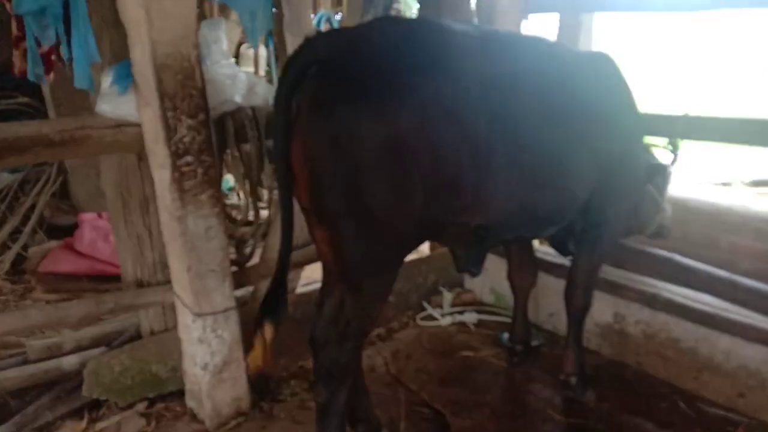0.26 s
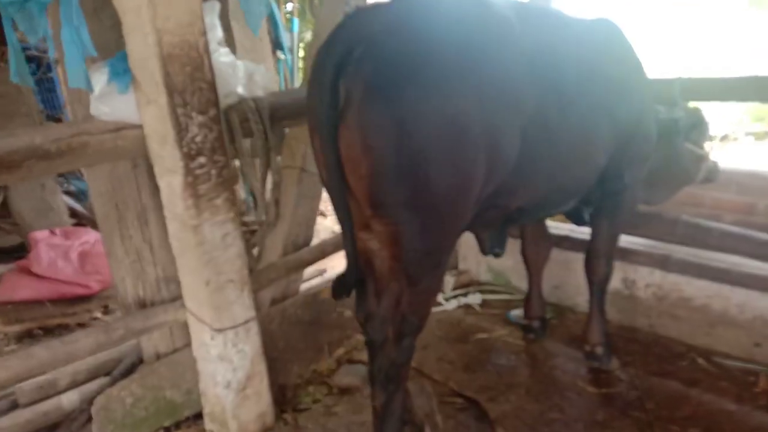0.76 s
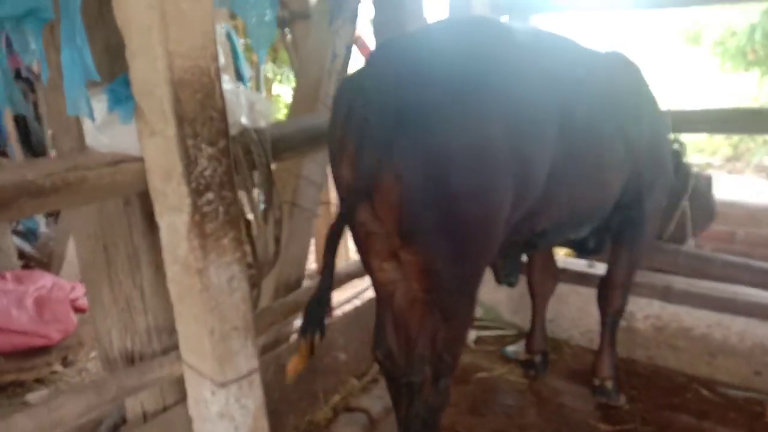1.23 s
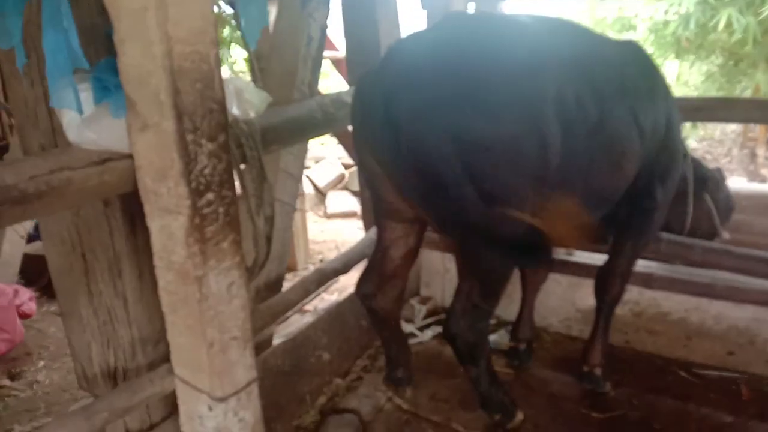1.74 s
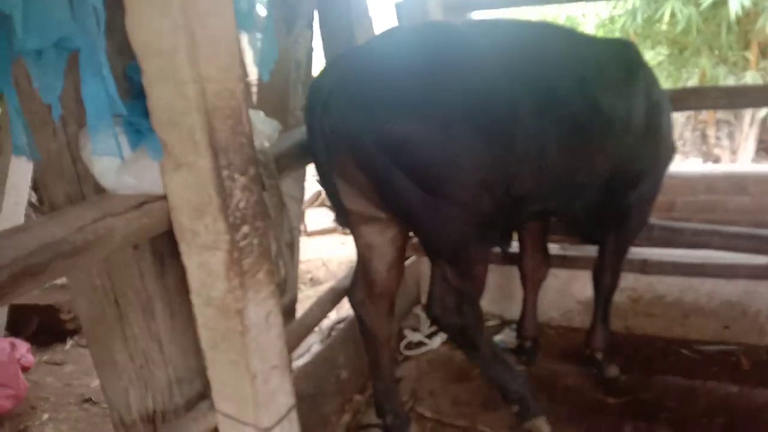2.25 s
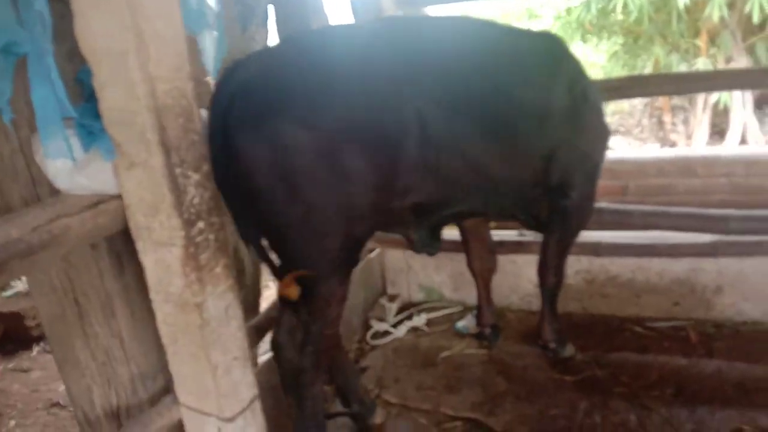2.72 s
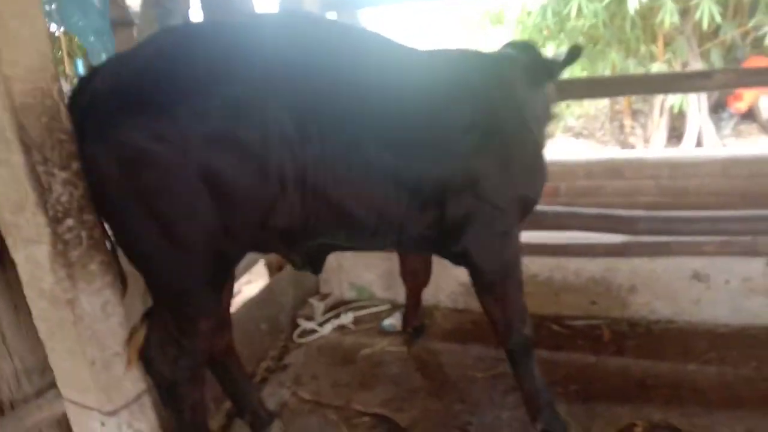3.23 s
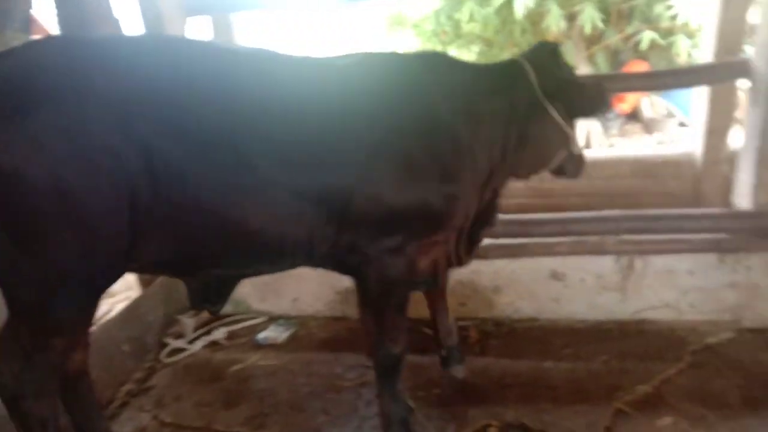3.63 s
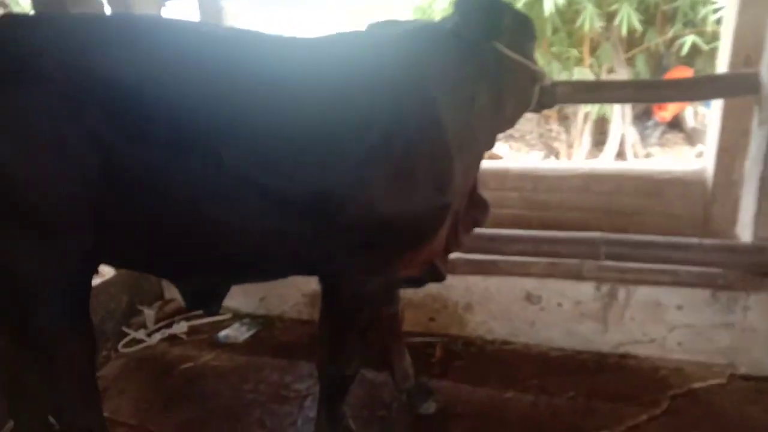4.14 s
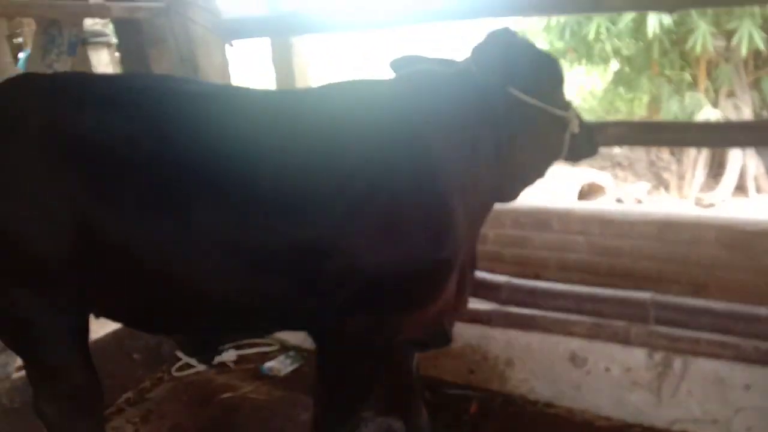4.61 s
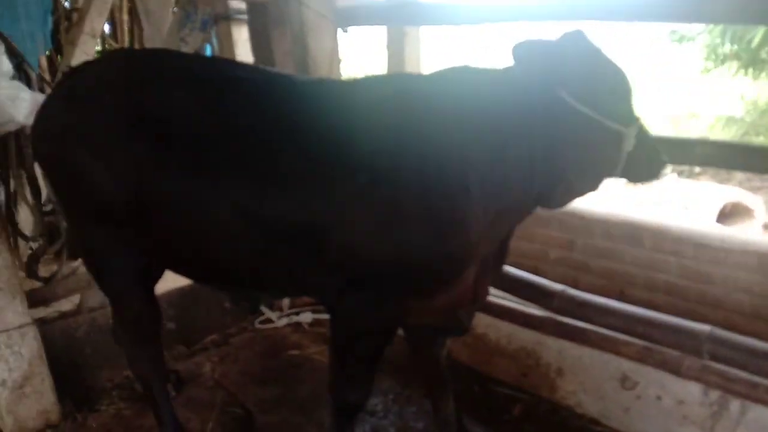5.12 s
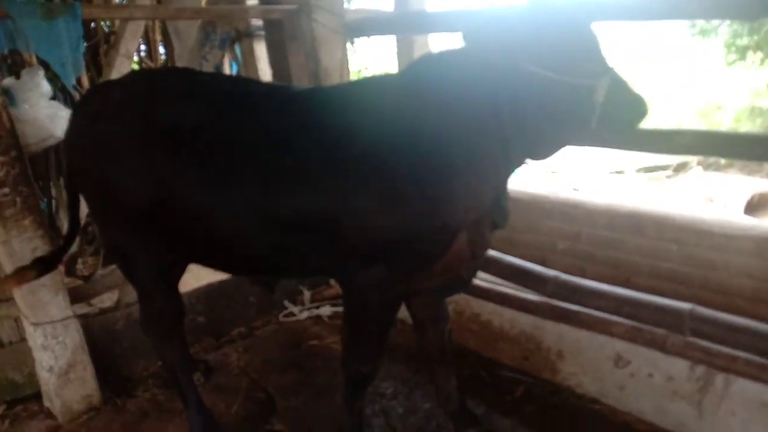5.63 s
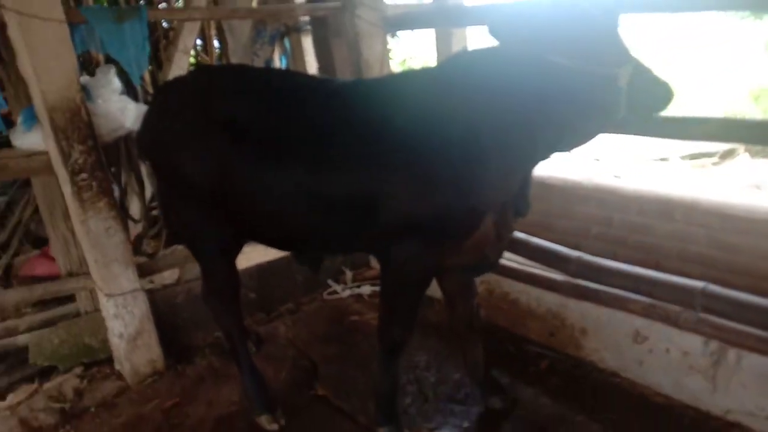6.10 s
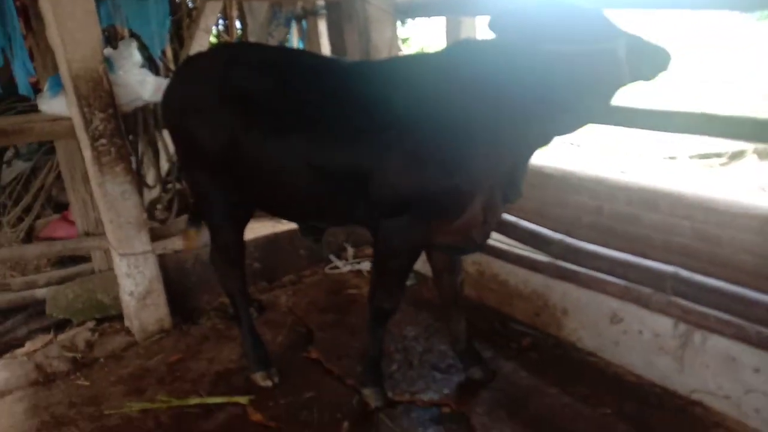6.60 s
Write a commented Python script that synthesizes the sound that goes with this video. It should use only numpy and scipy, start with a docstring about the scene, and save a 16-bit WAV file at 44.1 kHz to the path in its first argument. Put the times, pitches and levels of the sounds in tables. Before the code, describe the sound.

A soft outdoor hiss, a low throbbing rumble and a faint high insect sit in the background of an open barn, heard through a phone microphone with a short reverberation. Hooves scuff lightly in straw around 0.5 seconds. From 0.8 to 1.7 seconds a calf gives one low, booming moo, sinking in pitch and ending rough and breathy. Hooves knock on boards near 2 seconds, then keep scuffing and knocking, with a sharp scrape just after 3 seconds. From about 2.9 to 5 seconds a rooster in the yard crows hoarsely in short broken notes, holding longer ones around 4 to 4.7 seconds. Quieter straw rustles follow, with hoof knocks near 5.7 and 6.4 seconds and a faint, far bird whistle around 6.4 seconds. At about 6.8 seconds a new moo just begins as the sound ends.

```python
"""A calf moos once in an open barn, then a rooster crows hoarsely in the yard; a new moo sets in at the end.
Hooves scuff and knock on floor and boards, straw rustles, an insect and a far bird whistle faintly
and a low rumble throbs. Both voices are pulses plus breath, shaped by mouth and nose or by the beak;
low resonances of throat and barn make the moo boom. Hooves are noise bursts and board rings.
The phone's microphone port rings near 1.3 and 7.5 kHz and dips slightly near 15 kHz."""
import sys
import numpy as np
from scipy import signal
from scipy.fft import rfft, irfft, next_fast_len
from scipy.io import wavfile
from scipy.ndimage import uniform_filter1d, map_coordinates

SR = 44100
rng = np.random.default_rng(int(sys.argv[2]) if len(sys.argv) > 2 else 0)


def master(y):
    """Save y as 16-bit WAV."""
    cut = np.clip(np.atleast_2d(y).T, -1, 1)
    pcm = np.round(cut * 32767)  # scale
    wavfile.write(sys.argv[1], SR, pcm.astype(np.int16))


N = 302526

# straw spectrum: (frequency [Hz], gain [dB])
STRAW_SPECTRUM = [(3000, -14), (5500, -0.5), (7200, 1), (8600, -6), (10500, -13.5), (13200, -22.5),
                  (14600, -6.5), (15800, -7)]


def amp(db):
    return 10 ** (np.asarray(db) / 20)


def unit(x):
    return x / np.sqrt(np.mean(x ** 2) + 1e-20)


def along(points, hz):
    """Interpolate (Hz, value) points on a log axis."""
    f, v = np.transpose(points)
    return np.interp(np.log(hz + 1), np.log(f + 1), v)


def curves(rows):
    """One value per sample for each column after the time."""
    s, *cols = np.transpose(rows)
    return [np.interp(np.arange(N) / SR, s, c) for c in cols]


def sounding(rows):
    """1 between the first and last row, with 5 ms edges."""
    t = np.arange(N) / SR
    return uniform_filter1d(1. * ((t > rows[0][0]) & (t < rows[-1][0])), size=220)


def wobble(rate_hz):
    """Smooth random curve, rate_hz knots a second."""
    at = np.arange(0, N + 16, 16)
    knots = rng.standard_normal(int(N * rate_hz / SR) + 4)
    return np.interp(np.arange(N), at, map_coordinates(knots, [at * rate_hz / SR]))


def filtered(x, response):
    m = next_fast_len(N + SR // 2)
    return irfft(rfft(x, m) * response(np.fft.rfftfreq(m, 1 / SR)), m)[..., :N]


def band(f, hz, width_hz):
    """Causal resonance, gain 1 at its centre."""
    return 1j * f * width_hz / (hz * hz - f * f + 1j * f * width_hz)


def modes(x, table):
    """Parallel resonances of alternating sign."""
    return filtered(x, lambda f: sum((-1) ** k * amp(db) * band(f, hz, width_hz)
                                     for k, (hz, width_hz, db) in enumerate(table)))


def coloured(x, spectrum):
    return filtered(x, lambda f: amp(along(spectrum, f)))


def steady(x, size):
    """Running rms brought to 1."""
    return x / np.sqrt(np.abs(uniform_filter1d(x * x, size)) + 1e-12)


def pulses(phase, sharp):
    """Pulse train; harmonic k goes as sharp^k."""
    return unit((1 - sharp ** 2) / (1 - 2 * sharp * np.cos(phase) + sharp ** 2) - 1)


def bursts(rows):
    """Envelope from (time [s], level [dB], rise [s], t60 [s]) rows."""
    env, t = np.zeros(N + SR), np.arange(SR // 3) / SR
    for s, db, rise_s, t60_s in rows:
        env[round(s * SR):][:len(t)] += amp(db - 60 * t / t60_s) * (1 - np.exp(-t / rise_s))
    return env[:N]


def crackle(spectrum, grains_per_s=500, spread_db=3):
    """Coloured noise with sparse sharp grains."""
    hits = rng.random(N) < grains_per_s / SR
    grains = hits * amp(spread_db * np.minimum(rng.exponential(size=N), 3)) * rng.standard_normal(N)
    hiss = rng.standard_normal(N) * amp(2 * wobble(120))
    return unit(coloured(hiss + 2.2 * grains, spectrum))


def whistle(rows):
    """Sliding noise band from (time [s], centre [Hz], width [Hz], level [dB]) rows."""
    hz, width_hz, db = curves(rows)
    at = np.cumsum(width_hz) / SR
    count = int(at[-1]) + 4
    i, q = [np.interp(at, np.arange(count), rng.standard_normal(count)) for _ in range(2)]
    phase = 2 * np.pi * np.cumsum(hz) / SR
    return sounding(rows) * amp(db) * (i * np.cos(phase) + q * np.sin(phase))


def yard():
    """Gusty hiss with random gain patches, some hundred Hz by 0.1 s."""
    # (frequency [Hz], gain [dB])
    spectrum = [(150, -1), (400, -6.5), (800, -6.5), (1500, -5.5), (2200, -15), (3500, -18), (5000, -16.5),
                (7500, -20), (9000, -53.5), (12000, -48), (16000, -41)]
    # (time [s], level [dB])
    levels = [(0, -51), (.75, -54), (.95, -45.5), (1.75, -50), (2.3, -57.5), (2.85, -50.5), (4.5, -57.5),
              (4.95, -51), (5.15, -56), (5.8, -61), (6.35, -53.5), (6.7, -54.5), (6.86, -49)]
    gusts = amp(1.8 * wobble(12))
    z = signal.stft(rng.standard_normal(N), nperseg=512)[2]
    patches = uniform_filter1d(rng.standard_normal(z.shape), size=5, axis=0)
    patch_db = 3.5 * unit(uniform_filter1d(patches, size=16, axis=1))
    hiss = signal.istft(z * amp(patch_db), nperseg=512)[1][:N]
    return amp(curves(levels)[0]) * gusts * unit(coloured(hiss, spectrum))


def rumble():
    """Low noise throbbing about ten times a second."""
    # (frequency [Hz], gain [dB])
    spectrum = [(25, -53), (55, -12), (92, -1), (125, -5), (180, -21), (300, -68.5)]
    # (time [s], level [dB])
    levels = [(0, -51), (3, -57), (5.0, -50), (5.8, -49.5), (6.86, -49.5)]
    throb_hz = 9.5 + 2 * wobble(3)
    throb_db = 4 * np.cos(2 * np.pi * np.cumsum(throb_hz) / SR) + 2.5 * wobble(20)
    drift_db = 2 * wobble(5)
    noise = coloured(rng.standard_normal(N), spectrum)
    return amp(curves(levels)[0]) * unit(amp(throb_db + drift_db) * noise)


def insect_and_bird():
    """Two faint whistles that come and go."""
    # (time [s], centre [Hz], width [Hz], level [dB])
    insect = [(0, 4540, 80, -60), (.46, 4520, 80, -59), (.52, 4480, 90, -70), (5.1, 4480, 120, -67),
              (5.5, 4420, 120, -65), (6.1, 4620, 120, -65), (6.2, 4800, 120, -67), (6.86, 4600, 120, -74)]
    bird = [(6.2, 5920, 150, -66), (6.45, 6360, 100, -59), (6.58, 6400, 100, -73)]
    return unit(amp(2.5 * wobble(14))) * (whistle(insect) + whistle(bird))


def straw_and_breath():
    """Straw rustle, plus the breathy high hiss of the calf's moo from 1.0 to 1.6 s."""
    # (time [s], level [dB])
    levels = [(0, -59), (.3, -66), (.88, -59.5), (1.03, -49), (1.15, -55.5), (1.5, -44), (1.72, -56.5),
              (2.75, -58.5), (3.0, -61), (4.5, -62), (5.05, -73.5), (5.18, -54), (5.36, -54.5), (5.48, -71),
              (5.72, -49.5), (5.95, -66.5), (6.86, -64.5)]
    hiss = crackle(STRAW_SPECTRUM, grains_per_s=690, spread_db=-5)
    return amp(curves(levels)[0]) * unit(hiss * amp(1.6 * wobble(23)))


def hoof_scuffs():
    """A tick, then straw rustle and a duller drag."""
    # (time [s], straw [dB], drag [dB], t60 [s])
    scuffs = [(.063, -47.5, -56, 0.11), (0.502, -48.5, -53, .2), (.64, -46.5, -40, 0.16),
              (2.09, -44.5, -52, 0.049), (2.149, -45.5, -58, 0.18), (2.197, -43, -52.5, 0.16),
              (2.333, -36, -58, 0.24), (2.486, -36.5, -40.5, 0.079), (2.597, -39, -42, 0.24),
              (2.744, -43.5, -41, .12), (2.852, -42, -40.5, 0.43), (2.921, -54, -33, .055),
              (3.143, -25, -32, 0.092), (3.18, -42, -36, .12), (3.436, -43, -51, 0.14),
              (3.667, -34.5, -34.5, 0.12), (3.912, -36.5, -40, 0.19), (4.05, -38.5, -53.5, 0.11),
              (4.158, -40, -42, 0.15), (4.318, -31, -40, 0.086), (4.465, -45.5, -54, .084),
              (4.59, -39.5, -37, .19), (4.735, -44, -44, 0.15), (5.161, -50, -54.5, .11),
              (5.228, -54.5, -55, 0.12), (5.454, -49.5, -53, 0.2), (5.612, -49.5, -45.5, .16),
              (5.654, -44.5, -45, .22), (5.6903, -45, -61, 0.074), (5.751, -48.5, -58, 0.35),
              (6.259, -49, -59, 0.15), (6.377, -53, -62.5, .1), (6.493, -48.5, -64, 0.049)]
    # (frequency [Hz], gain [dB])
    drag_spectrum = [(1200, -2.5), (2500, -6.5), (4500, 1.5), (6300, -3), (8000, -19)]
    rise_per_t60, tick_db, tick_rise_s, tick_t60_s = .047, -7.5, .0005, .014
    rustles = bursts([(s, db, rise_per_t60 * t60, t60) for s, db, _, t60 in scuffs])
    drags = bursts([(s, db, rise_per_t60 * t60, t60) for s, _, db, t60 in scuffs])
    ticks = bursts([(s, db + tick_db, tick_rise_s, tick_t60_s) for s, db, _, _ in scuffs])
    return (rustles + ticks) * crackle(STRAW_SPECTRUM) + (drags + ticks) * crackle(drag_spectrum)


def hoof_knocks():
    """Each hoof thuds, clacks and briefly rings the board it lands on."""
    # (time [s], thud [dB], clack [dB], t60 [s], ring [Hz], ring [dB])
    knocks = [(0.502, -42.5, -47.5, 0.24, 460, -46), (0.626, -39.5, -49.5, .27, 310, -38.5),
              (1.836, -35.5, -49, 0.063, 1040, -29.5), (1.843, -56, -58, 0.079, 397, -32.5),
              (1.957, -38, -41.5, 0.18, 2500, -25), (2.015, -36, -68, 0.097, 604, -48),
              (2.488, -44, -46, 0.1, 354, -43), (3.438, -35.5, -46, 0.057, 318, -28.5),
              (3.908, -31.5, -47, 0.074, 308, -32.5), (5.66, -51.5, -54, 0.14, 890, -72),
              (5.696, -63, -45, 0.094, 1570, -31.5), (6.218, -50, -73, 0.34, 407, -45),
              (6.386, -33, -47.5, 0.08, 1680, -31)]
    # (frequency [Hz], gain [dB])
    thud_spectrum = [(120, 4.5), (250, 3), (450, 6), (900, 3), (1500, -36.5)]
    clack_spectrum = [(500, -48), (1100, 10.5), (2500, 2.5), (4000, -4), (7000, -56)]
    thud_rise_s, clack_rise_s, ring_t60_cycles = .0064, .0016, 22.5
    thuds = bursts([(s, db, thud_rise_s, t60) for s, db, _, t60, *_ in knocks])
    clacks = bursts([(s, db, clack_rise_s, t60) for s, _, db, t60, *_ in knocks])
    rings, t = np.zeros(N + SR), np.arange(SR // 5) / SR
    for s, *_, hz, db in knocks:
        decay = amp(db - 60 * t * hz / ring_t60_cycles)
        rings[round(s * SR):][:len(t)] += decay * np.sin(2 * np.pi * hz * t)
    return rings[:N] + thuds * crackle(thud_spectrum) + clacks * crackle(clack_spectrum)


def crow_phrase():
    """Gain and voicing curves: each note starts fast, dies slower and glides into the next."""
    # (start [s], end [s], first pitch [Hz], last pitch [Hz], first level [dB], last level [dB],
    #  pitch/3 beat [depth], pitch/2 beat [depth], hoarseness [0-1], low, overtone, rasp [dB re note])
    notes = [(2.854, 2.91, 704.3, 729, -37, -37, .3, .4, 0.53, -8, -26, -9.5),
             (2.949, 2.986, 659.4, 639, -35, -39, .05, 1, 0.37, -6, -32, -8),
             (3.124, 3.145, 630, 643.8, -32.5, -38.5, 0.22, 0.68, .3, -4, -39, -10.5),
             (3.164, 3.241, 750, 773.8, -33.5, -28, 0.24, 0.25, 0.26, -9, -30, -12),
             (3.333, 3.356, 658.5, 657, -35, -28.5, 0.056, 0.37, 0.31, -12, -40, -19.5),
             (3.379, 3.569, 774.5, 759.7, -31, -32.5, 0.69, 0.43, 0.31, -6.5, -31, -14),
             (3.59, 3.669, 668, 665.3, -31, -32, .05, .4, 0.33, -10.5, -38, -17),
             (3.711, 3.766, 683.5, 687, -32, -36, .05, 0.78, 0.16, -16.5, -36, -17.5),
             (3.805, 3.861, 903, 873.7, -39.5, -53, 0.14, 0.13, 0.08, -2, -19, -8.5),
             (3.892, 3.932, 917, 925.6, -44, -43, 0.1, 0.22, 0.02, -1, -17.5, -9.5),
             (3.95, 4.287, 806.3, 798.3, -35, -37, 1.56, .1, 0.32, -8, -14, -15),
             (4.341, 4.419, 831, 802.4, -34.5, -30.5, 0.6, .06, .1, -18.5, -17.5, -18.5),
             (4.465, 4.678, 816, 786.4, -32.5, -33, 0.041, .03, 0, -19, -18.5, -31.5),
             (4.7, 4.733, 676.7, 670.5, -33.5, -34.5, .05, 0.27, .2, -31, -22, -23),
             (4.761, 4.787, 638.7, 634.7, -39.5, -41, 0.88, 0.2076, .2, -17, -13, -11.5),
             (4.802, 4.863, 934, 905, -42.5, -44, 0.044, .6, 0, 1, -17, -13),
             (4.873, 4.89, 644, 654.6, -35, -37, .05, .02, 0.06, -25, -29.5, -25),
             (4.905, 4.985, 732, 710.6, -33.5, -44, 1.3, .02, 0.55, -6.5, -18.5, -18.5)]
    attack_s, release_s, rest_db, waver_db = .038, .068, -62.5, 4.5
    t = np.arange(N) / SR
    envelopes_db, knots = [], []
    for start, end, first_hz, last_hz, first_db, last_db, *timbre in notes:
        corners_s = [start - attack_s, start, end, end + release_s]
        envelopes_db.append(np.interp(t, corners_s, [rest_db, first_db, last_db, rest_db]))
        knots += [(start, first_hz, *timbre), (end, last_hz, *timbre)]
    voicing = curves(knots)
    hoarse = voicing[3]
    db = uniform_filter1d(np.max(envelopes_db, axis=0), size=400) + waver_db * hoarse * wobble(30.16)
    gate = sounding([(notes[0][0] - attack_s,), (notes[-1][1] + release_s,)])
    return gate * amp(db), voicing


def rooster():
    """Syrinx pulses beat at a third or half of the pitch and break into flutter when hoarse."""
    # voice bands: (frequency [Hz], gain [dB])
    beak_low = [(330, -72), (480, 5), (750, 3.5), (1000, 6), (1150, -38.5)]
    beak_mid = [(900, -39), (1100, 0), (1350, 4), (1600, 4), (1900, -9), (2080, -23), (2250, -30),
                (2400, -100.5)]
    beak_top = [(1600, -34), (1800, 13), (2100, -8.5), (2350, -43)]
    overtone = [(2000, -70), (2250, 11.5), (2800, 2.5), (3500, 5), (3900, -44.5)]
    rasp = [(3700, -43), (4300, 0.5), (5600, 0), (6400, -6.5), (8500, -23), (10500, -42)]
    # beak_top band: (time [s], level [dB re note])
    top_levels = [(2.85, -15), (3.15, -3), (3.7, -15), (4.0, -32)]
    # one track per wheeze: (time [s], centre [Hz], width [Hz], level [dB])
    wheezes = [
        [(3.36, 3110, 350, -61), (3.5, 2858, 198.6, -48), (3.74, 2764, 39.9, -52.5), (3.93, 2620, 40, -59)],
        [(3.92, 5570, 499.5, -57), (3.98, 5180, 497, -48), (4.08, 5000, 497, -56)],
        [(3.9, 4720, 597, -56), (4.03, 4430, 493, -39.5), (4.17, 4050, 512, -48.5)],
        [(4.02, 3750, 499.5, -45.5), (4.14, 3480, 498, -44.5), (4.42, 3070, 288, -57)],
        [(4.72, 2910, 120.2, -56.5), (4.86, 3027, 39.6, -45.5), (5.0, 2860, 100, -61)],
    ]
    gain, (hz, third, half, hoarse, low_db, overtone_db, rasp_db) = crow_phrase()
    jitter = .001 * wobble(30) + hoarse * (.035 * wobble(55) + .04 * wobble(14))
    phase = 2 * np.pi * np.cumsum(hz * (1 + jitter)) / SR
    beat = 1 + third * amp(3 * wobble(18)) * np.cos(phase / 3) + half * np.cos(phase / 2)
    flutter = np.sqrt(1 - hoarse) + np.sqrt(hoarse) * unit(wobble(500))
    hiss = rng.standard_normal(N) * amp(2.9 * wobble(80))  # air leaking past the membranes
    syrinx = pulses(phase, sharp=.923) * beat * flutter + .3 * hoarse * hiss
    parts = [(syrinx, beak_low, low_db), (syrinx, beak_mid, 0), (syrinx, beak_top, *curves(top_levels)),
             (syrinx + .9 * hiss, overtone, overtone_db), (syrinx + 2.7 * hiss, rasp, rasp_db)]
    voice = sum(amp(db) * steady(coloured(x, spectrum), size=2200) for x, spectrum, db in parts)
    return gain * voice + sum(whistle(rows) for rows in wheezes)


def calf():
    """Vocal-fold pulses and breath gated once a cycle ring mouth and nose and boom in throat and barn."""
    # one track per moo: (time [s], pitch [Hz], mouth [dB], boom [dB], nose [dB], bright edge [dB])
    moos = [
        [(.79, 92, -75, -71, -71, -77), (.805, 93.6, -40, -41.5, -48, -64.5),
         (.858, 104.8, -25.5, -33.5, -36, -41.5), (.954, 109, -23.5, -29.5, -29, -32.5),
         (1.03, 107, -23.5, -32.5, -29.5, -36), (1.148, 103.3, -22, -33, -33, -40.5),
         (1.243, 100.7, -22.5, -28, -30, -38), (1.349, 96.7, -23, -25, -35.5, -44),
         (1.411, 93.4, -24.5, -23, -36.5, -49), (1.469, 91.82, -17.5, -30, -31.5, -37.5),
         (1.503, 91.24, -34, -23.5, -39.5, -47.5), (1.553, 78.5, -25.5, -17.5, -37.5, -36.5),
         (1.63, 81.3, -30, -35.5, -36.5, -45.5), (1.7, 81.4, -79, -61, -73, -68)],
        [(6.74, 89.63, -88, -87, -84, -100), (6.79, 92.5, -57, -74, -56.5, -83.5),
         (6.9, 101, -38.5, -53.5, -51, -62)],
    ]
    # (time [s], roughness [0-1])
    roughness = [(.79, .4), (.85, .1), (.92, .03), (1.38, .04), (1.46, .13), (1.53, .55), (1.7, .8)]
    # resonances, boom = low ones of throat and barn: (centre [Hz], width [Hz], gain [dB])
    boom_modes = [(95.5, 35, -38), (205, 42, -22.5), (326.6, 18.6, -2.5), (380, 26.4, -1.5),
                  (569, 18, -16.5)]
    mouth_modes = [(668, 38, -12), (741, 26, -10.5), (887, 135, 0), (952, 100, 1.5), (1175, 74, 1.5),
                   (1270, 190, -4.5), (1540, 62, -3.5), (1830, 22, -11.5)]
    nose_modes = [(1997, 120, -6), (2215, 49, 5), (2377, 50, 2), (2586, 44, 7), (2910, 54, 2),
                  (3300, 104, -0.5), (3580, 99, -29)]
    edge_modes = [(3940, 23, -15.5), (4600, 31, -4), (5188, 50, 3.5), (5250, 96, 1), (6040, 140, -23),
                  (7240, 600, -27)]
    # the closing mouth lowers the edge modes: (time [s], lowered share [0-1])
    closing = [(.9, 0.54), (1.3, 0.6)]
    # open-mouthed rasp: (frequency [Hz], gain [dB])
    gasp_spectrum = [(3000, -36), (3600, 9.5), (5000, 1.5), (6300, 1.5), (7800, -13.5), (9500, -32)]
    hz, mouth_db, boom_db, nose_db, edge_db = curves(sum(moos, []))
    rough, = curves(roughness)
    share, = curves(closing)
    jitter = .0013 * wobble(50) + .06 * rough * wobble(50)
    phase = 2 * np.pi * np.cumsum(hz * (1 + jitter)) / SR
    breath = unit(rng.standard_normal(N) * (1.3 + np.cos(phase)))
    shimmer = amp(1.2 * wobble(60))
    folds = np.sqrt(1 - rough) * shimmer * pulses(phase, sharp=.97) + .7 * np.sqrt(rough) * breath
    airy = folds + (.14 + 1.1 * rough) * breath  # turbulence weighs more in the treble
    lowered_modes = [(.945 * centre, 1.07 * width, db) for centre, width, db in edge_modes]
    edge = unit((1 - share) * modes(airy, edge_modes) + share * modes(airy, lowered_modes))
    edge = (1 - rough) * edge + 1.6 * rough * share * unit(coloured(breath, gasp_spectrum))
    fundamental_db = boom_db - 24 + .5 * (100 - hz)  # grows as the pitch sinks
    parts = [(modes(folds, mouth_modes), mouth_db),
             (modes(folds, boom_modes), boom_db),
             (np.sin(phase), fundamental_db),
             (modes(airy, nose_modes), nose_db + wobble(35)),
             (edge, edge_db + wobble(35))]
    gate = sum(sounding(moo) for moo in moos)
    return gate * sum(amp(db) * steady(x, size=2600) for x, db in parts)


def barn(x):
    """Short reverberation; treble dies first."""
    # (frequency [Hz], t60 [s])
    decay = [(200, 0.26), (1500, 0.21), (8000, 0.078)]
    hz, t, z = signal.stft(rng.standard_normal(SR // 2), SR, nperseg=256)
    tail = signal.istft(z * amp(-60 * t / along(decay, hz)[:, None]), SR, nperseg=256)[1]
    delayed = np.pad(x, (500, 0))
    return signal.fftconvolve(delayed, tail / np.linalg.norm(tail))[:N]


def scene():
    moo, crow, hooves = calf(), rooster(), hoof_scuffs() + hoof_knocks()
    reverb = barn(amp(-7.5) * moo + amp(-5) * crow + amp(-11.5) * hooves)
    background = straw_and_breath() + yard() + rumble() + insect_and_bird()
    return (background + hooves + crow + moo + reverb)[None]


def record(dry):
    """Microphone port colour and notch, bass cut, amplifier saturation, band limit."""
    # two resonances and a slight dip: (centre [Hz], width [Hz], gain [dB])
    port_bands = [(1270.6, 66.6, 13.5), (7500, 920, 6.5), (15000, 1400, -3.5)]
    # (centre [Hz], width [Hz], depth [0-1])
    port_notch = (6600, 275, 0.77)
    bass_cut_hz, ceiling, top_hz = 60, .72, 15800
    notch_hz, notch_width_hz, depth = port_notch

    def response(f):
        port = np.prod([1 + (amp(db) - 1) * band(f, hz, width) for hz, width, db in port_bands], axis=0)
        notch = 1 - depth * band(f, notch_hz, notch_width_hz)
        bass_cut = (1j * f / (bass_cut_hz + 1j * f)) ** 2
        return port * notch * bass_cut

    x = filtered(dry, response)
    saturated = x / (1 + np.abs(x / ceiling) ** 4) ** .25
    return filtered(saturated, lambda f: f < top_hz)


dry = scene()
out = record(dry)
master(out)
```